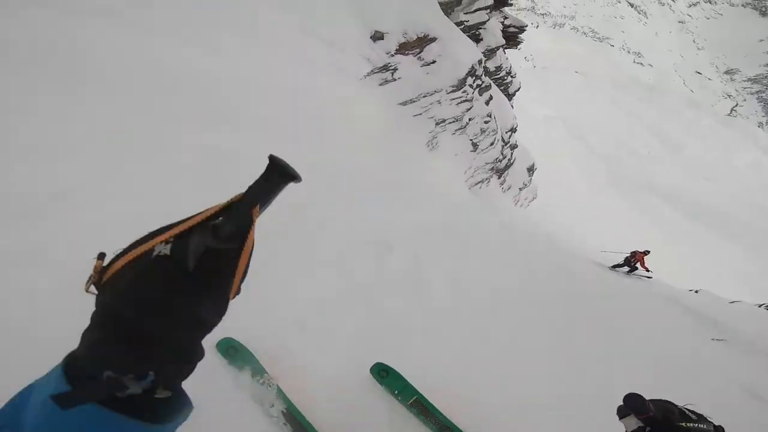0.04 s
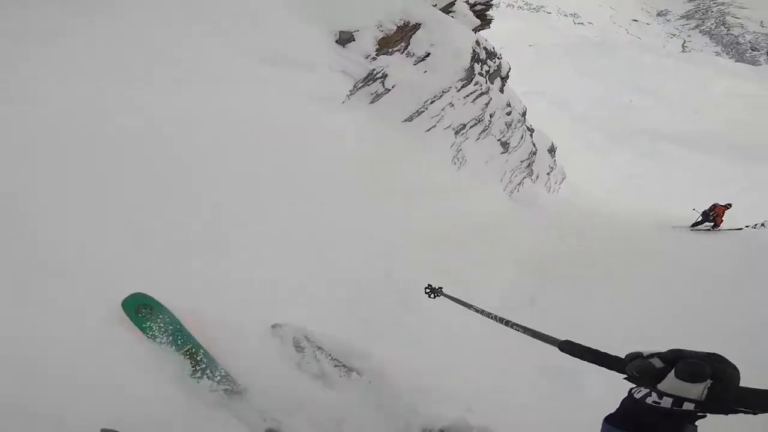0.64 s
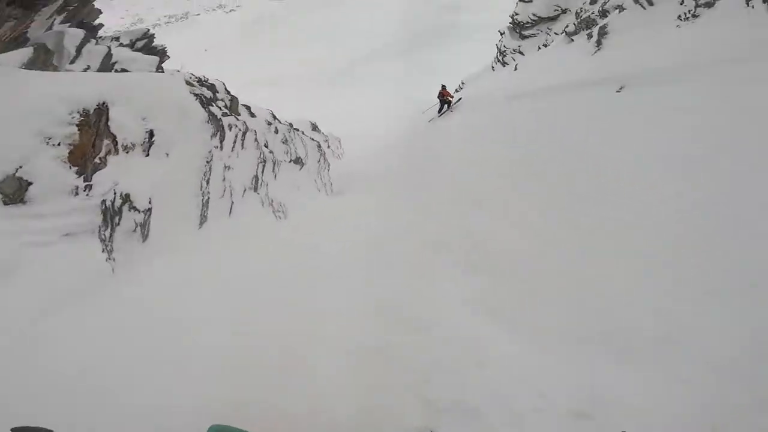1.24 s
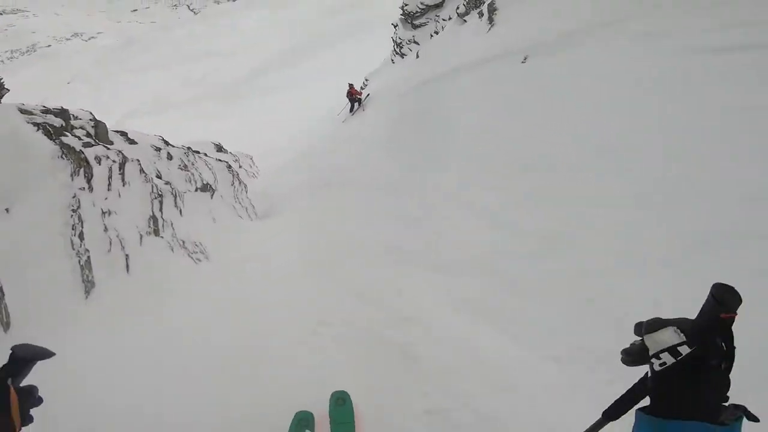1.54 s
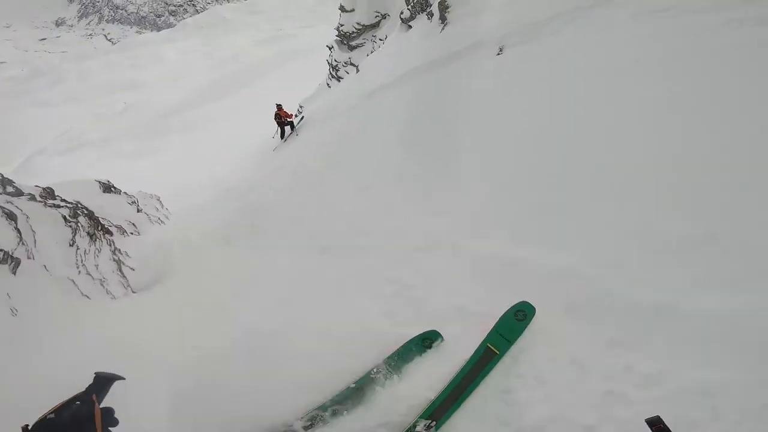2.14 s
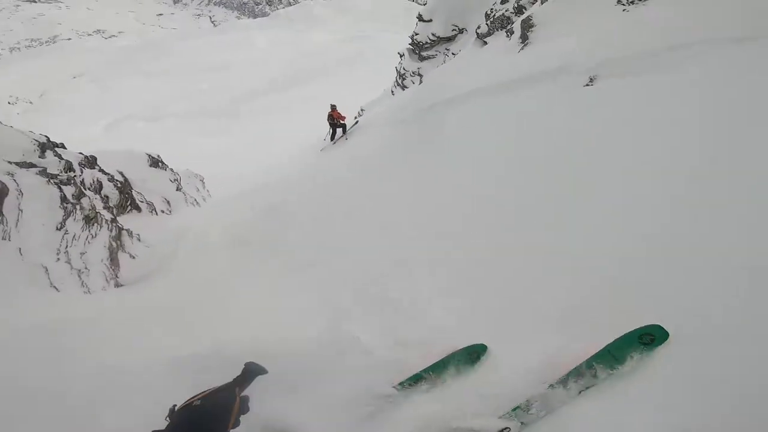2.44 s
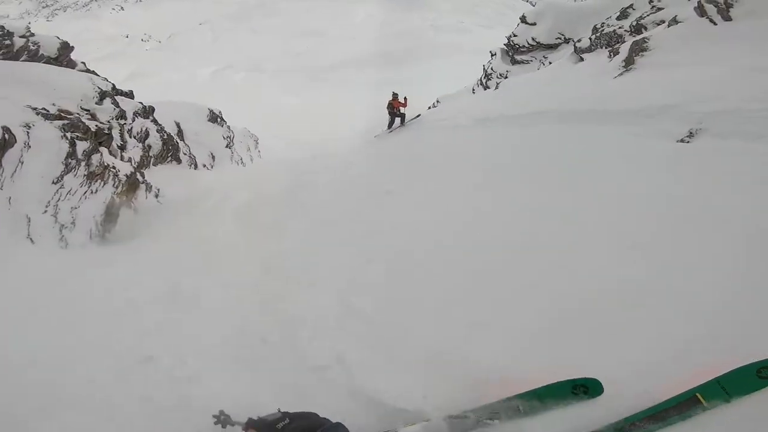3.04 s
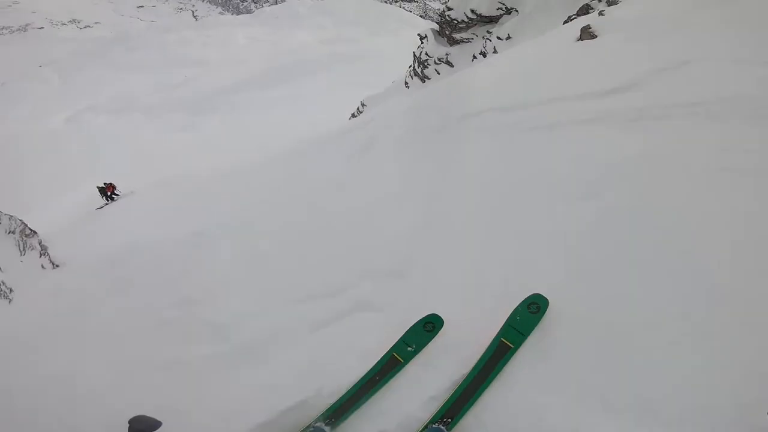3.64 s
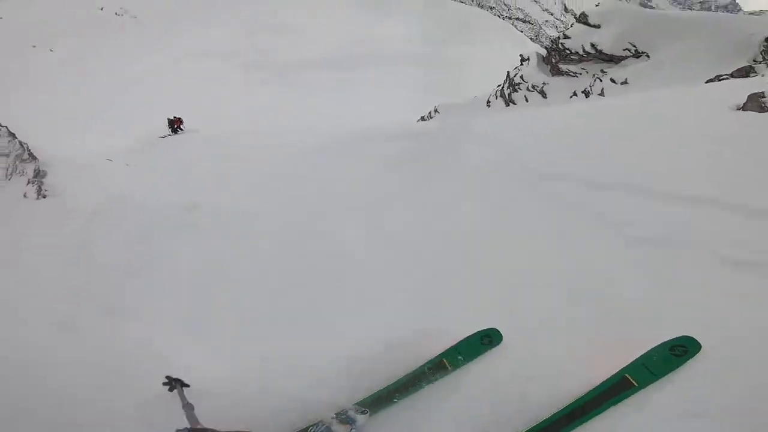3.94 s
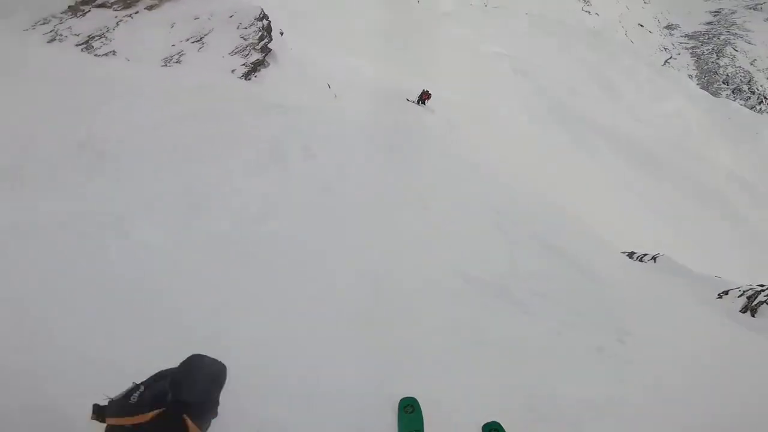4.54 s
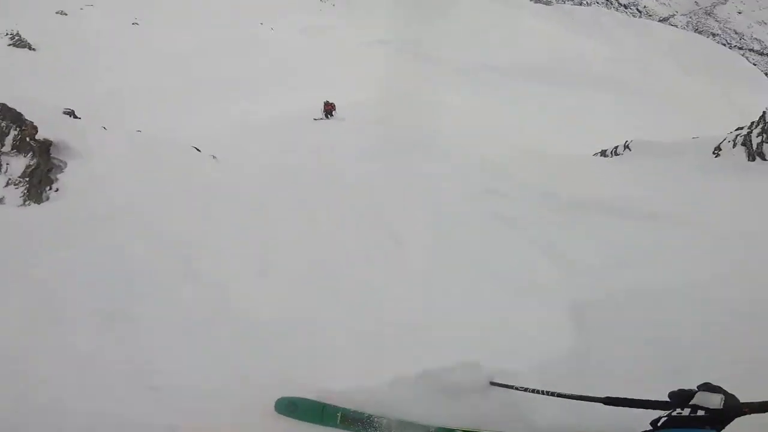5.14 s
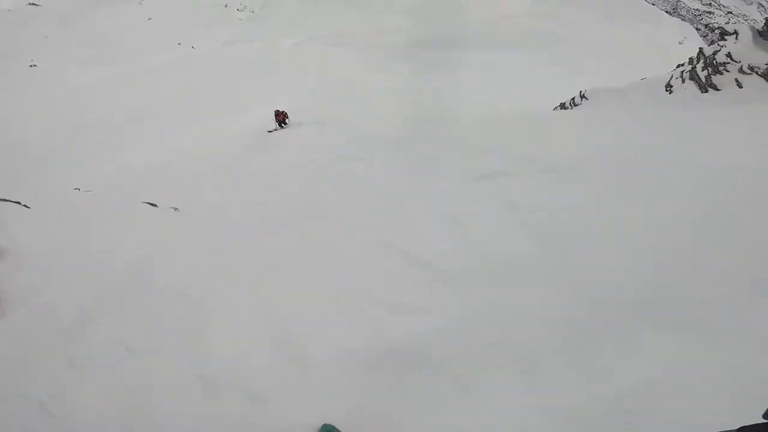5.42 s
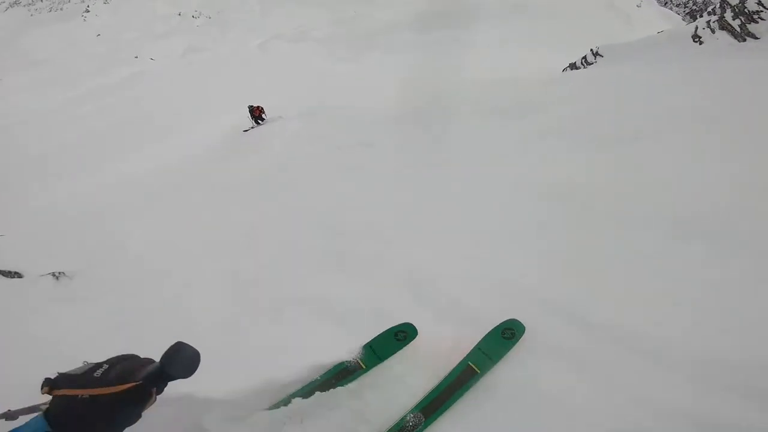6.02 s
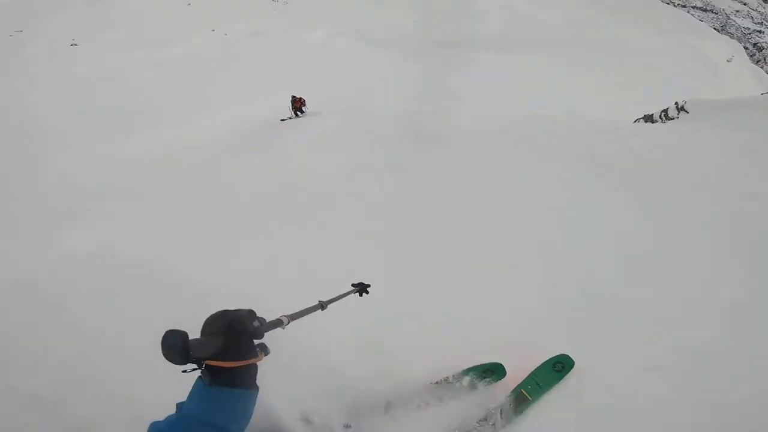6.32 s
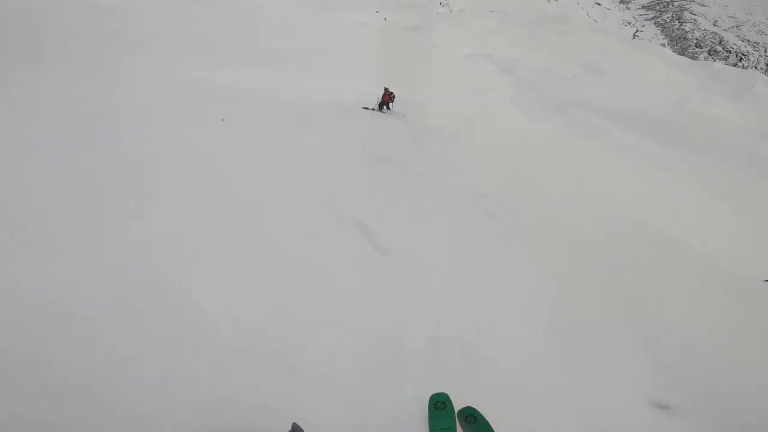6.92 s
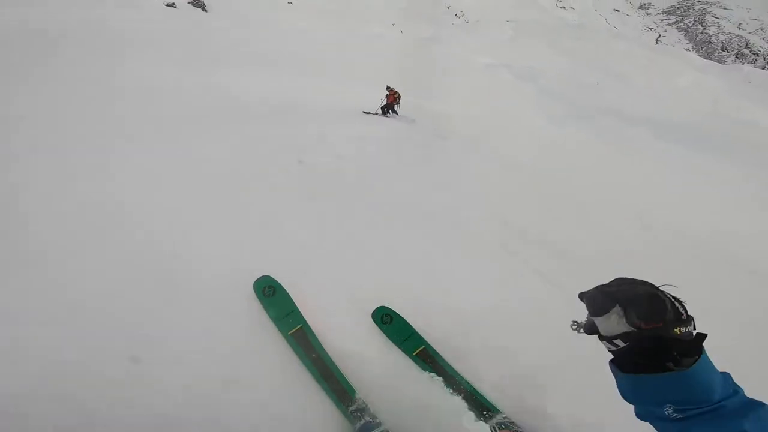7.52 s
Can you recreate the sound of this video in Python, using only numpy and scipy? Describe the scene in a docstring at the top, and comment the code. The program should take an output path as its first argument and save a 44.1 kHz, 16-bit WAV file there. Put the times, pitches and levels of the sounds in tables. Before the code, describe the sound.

Skis scrape and swish through snow in linked turns, with gusts of wind buffeting the microphone and a few gear clacks.

```python
"""Skis link turns down a steep snow slope, heard from the skier's helmet.
In each turn the edges bite and ring, then skid, shoving snow aside and spraying it.
The gear clacks amid hollow swishes and scuffs; between turns gusts buffet the microphone.
Near the middle the sound cuts out for a moment and fades back in."""
import sys
import numpy as np
from scipy import signal
from scipy.fft import rfft, irfft, next_fast_len
from scipy.io import wavfile
from scipy.ndimage import uniform_filter1d, map_coordinates

SR = 44100
rng = np.random.default_rng(int(sys.argv[2]) if len(sys.argv) > 2 else 0)


def transcribe(signal):
    """Save signal, clipped to [-1, 1], as a 16-bit WAV file at the path in sys.argv[1]."""
    frames = np.atleast_2d(signal).T
    limited = np.clip(frames, -1, 1)
    pcm = np.round(limited * 32767).astype(np.int16)
    wavfile.write(sys.argv[1], SR, pcm)


N = 342657
T = np.arange(N) / SR

# Edge load per turn: full_s, rise_s, hold_s, release_s, scrape_db, rasp_re_grind_db,
# shove_re_scrape_db, spray_re_scrape_db, ring_hz, slide_hz_per_s, ring_re_scrape_db
TURN_LOADS = [(0.038, 0.13, 0.16, 0.74, -27, 1, -7.5, -13.5, 2360, 0, -21),
              (2.011, 0.66, 0.38, 0.15, -44, 32, -14.5, -8, 3030, 501, -7),
              (2.801, 0.54, 0.23, 0.3, -26, 0.5, -17.5, -23.5, 2790, -900, -18.5),
              (3.765, .11, 0.36, 0.22, -25.5, -0.5, -19.5, -17.5, 2780, 400, -11),
              (4.721, 0.076, 0.26, 0.46, -29, 2.5, -6, -13, 2973, -450, -10),
              (5.934, 0.35, 0.46, .29, -35, 4, -18, -13.5, 2934, -100, -11),
              (7.44, 0.74, 0.27, 0.44, -37.5, 8, -18, -4.5, 2227, -450, -2)]
LOAD_EXPONENT = 1.56  # edge amplitude = load ** exponent
# Thrown-snow spectrum: freq_hz, gain_db
SPRAY_SPECTRUM = [(2500, -0.5), (4500, 3), (5300, 1), (6300, -2), (7500, -2), (8700, -7), (9900, -8.5),
                  (11000, -21), (12800, -31), (14200, -32.5), (15000, -55)]


def undb(db):
    """Decibels to gain."""
    return 10 ** (np.asarray(db) / 20)


def unit(x):
    """Scale to rms 1."""
    return x / np.sqrt(np.mean(x ** 2))


def add(out, start_s, x):
    """Mix x into out."""
    i = max(int(start_s * SR), 0)
    out[i:i + len(x)] += x[:N - i]


def colour(x, spectrum):
    """Filter by (freq_hz, gain_db) points; 12 dB/octave skirts."""
    hz, db = np.transpose(spectrum)
    size = next_fast_len(N + 4096)
    bin_hz = np.maximum(np.arange(size // 2 + 1) * SR / size, 1)
    gain = undb(np.interp(np.log(bin_hz), np.log(hz), db))
    skirts = np.minimum(bin_hz / hz[0], 1) ** 2 * np.minimum(hz[-1] / bin_hz, 1) ** 2
    return irfft(rfft(x, size) * gain * skirts, size)[:N]


def walk(rate_hz):
    """Random line segments, rms 1."""
    knots = rng.standard_normal(8192)
    return unit(map_coordinates(knots, [T * rate_hz], order=1, mode="wrap"))


def flutter(rate_hz, depth_db):
    """Wavering gain, mean power 1."""
    return unit(undb(depth_db * walk(rate_hz)))


def swell(full_s, rise_s, hold_s, release_s):
    """Trapezoid envelope, 0 to 1."""
    corners_s = [full_s - rise_s, full_s, full_s + hold_s, full_s + hold_s + release_s]
    return np.interp(T, corners_s, [0, 1, 1, 0])


def narrow_noise(centre_hz, width_hz):
    """Noise band following a per-sample centre."""
    draw = rng.standard_normal((2, N))
    lowpass = signal.butter(2, width_hz / 2, fs=SR, output="sos")
    baseband = signal.sosfilt(lowpass, draw[0] + 1j * draw[1])[-len(centre_hz):]
    return np.real(baseband * np.exp(2j * np.pi * np.cumsum(centre_hz) / SR))


def burst(half_s, start_hz, end_hz, width_hz):
    """Gliding noise band: swells for half_s, fades for half_s."""
    progress = np.linspace(0, 1, int(2 * half_s * SR))
    band = narrow_noise(np.interp(progress, [1 / 4, 3 / 4], [start_hz, end_hz]), width_hz)
    return unit(band * np.sin(np.pi * progress) ** 2) / np.sqrt(2)


def eddies(spectrum, span_s):
    """Turbulence in a steady stream, level partly evened over span_s."""
    x = unit(colour(rng.standard_normal(N), spectrum))
    local_power = np.abs(uniform_filter1d(x ** 2, size=int(span_s * SR)))
    return unit(x / np.sqrt(local_power + 0.25))


def gust_gains():
    """Rumble and buffet gains: even airflow plus gusts, strongest with the skis pointing downhill."""
    # Gusts: full_s, hold_s, rumble_db, buffet_db
    gusts = [(0, 0.59, -32.5, -41.5), (0.633, 0.086, -27, -31), (0.922, 0.21, -34, -55),
             (1.358, 0.066, -21, -25.5), (1.543, 0.17, -26, -27), (1.815, 0.17, -23, -26),
             (2.021, 0.44, -24.5, -35), (2.623, 0.069, -33, -48), (3.338, 0.46, -29.5, -32),
             (3.8, 0.14, -33, -40), (4.542, 0.65, -37, -36), (5.31, 0.11, -34, -62),
             (5.567, 0.29, -28, -47.5), (5.843, 0.3, -26.5, -28), (6.19, 0.19, -32, -39.5),
             (6.851, 0.29, -29, -29.5), (7.213, 0.38, -23.5, -33), (7.64, 0.15, -33, -34.5)]
    stream_rumble_db, stream_buffet_db, growth_db_per_s = -43, -50, 1
    power = undb([[stream_rumble_db], [stream_buffet_db]]) ** 2
    for full_s, hold_s, rumble_db, buffet_db in gusts:
        growth = undb(growth_db_per_s * np.clip(T - full_s, 0, hold_s))
        gust = swell(full_s, rise_s=0.1, hold_s=hold_s, release_s=0.063) * growth
        power = power + np.outer(undb([rumble_db, buffet_db]), gust) ** 2
    return np.sqrt(power)


def wind():
    """Large eddies rock the diaphragm; small ones come in clumps and crackle on their crests."""
    # Large-eddy, small-eddy and tearing-air spectra: freq_hz, gain_db
    rumble_spectrum = [(10, -10), (22, -3), (42, 0), (74, 0), (110, -5.5), (170, -14.5), (350, -31.5)]
    buffet_spectrum = [(60, -50.5), (115, 2), (160, -0.5), (230, -5), (330, -11.5), (600, -18),
                       (1200, -31.5)]
    crackle_spectrum = [(280, -10), (420, 1), (700, -9.5), (1200, -12), (1800, -14.5), (3200, -49)]
    # Sharp slaps of air: middle_s, half_s, level_db, centre_hz
    slaps = [(0.045, 0.011, -20.5, 151), (0.096, 0.013, -31, 162), (0.188, 0.044, -32.5, 186),
             (1.257, 0.046, -29.5, 71), (1.364, 0.03, -40, 597), (1.385, 0.081, -30, 136.4),
             (1.517, 0.024, -25, 147), (1.569, 0.027, -36, 1037), (1.603, 0.016, -32.5, 717),
             (1.608, 0.018, -20, 232), (1.647, 0.02, -22.5, 160), (1.7, 0.025, -19, 100),
             (1.82, 0.032, -16, 80.5), (1.863, 0.0091, -26, 749), (1.878, 0.024, -20.5, 232),
             (1.938, 0.021, -17.5, 81), (2.045, 0.023, -19.5, 77), (2.232, 0.021, -32, 595),
             (4.243, 0.018, -38, 130), (4.317, 0.0284, -35.5, 123), (4.472, 0.045, -31.5, 59.5),
             (4.558, 0.0166, -25, 89), (5.221, 0.014, -50, 610), (5.559, 0.015, -32, 191),
             (5.869, 0.011, -22, 180), (5.956, 0.017, -24, 80), (6.374, .025, -33, 133),
             (6.708, 0.026, -31.5, 150), (7.001, 0.055, -23.5, 135.6), (7.023, 0.029, -21, 65),
             (7.315, .02, -25.5, 160), (7.585, .02, -23, 149.3)]
    rumble_gain, buffet_gain = gust_gains()
    rumble = eddies(rumble_spectrum, span_s=0.21)
    buffets = eddies(buffet_spectrum, span_s=0.055) * flutter(rate_hz=97, depth_db=1.5)
    crests = np.clip(buffets, 0, 2) ** 2
    crackle = undb(-14.5) * unit(colour(rng.standard_normal(N) * crests, crackle_spectrum))
    out = rumble * rumble_gain + (buffets + crackle) * buffet_gain
    for middle_s, half_s, level_db, centre_hz in slaps:
        slap = burst(half_s, centre_hz, centre_hz, width_hz=0.76 * centre_hz)
        add(out, middle_s - half_s, undb(level_db) * slap)
    return out


def swishes():
    """Hollow sliding swishes, ski skids on snow and brief scuffs, each with a rough band above."""
    # Swishes, skids and scuffs: middle_s, half_s, start_hz, end_hz, width_hz, level_db
    sweeps = [(0.268, 0.18, 1050, 853, 540, -31.5), (1.144, .028, 2300, 1910, 1600, -37),
              (1.245, 0.15, 1750, 1750, 550, -43.5), (1.497, 0.029, 1493, 1430, 400, -42.5),
              (2.65, 0.23, 1077, 1016, 397, -41.5), (4.138, 0.21, 1063, 717, 398, -41),
              (4.418, 0.053, 154, 186, 40, -29.5), (4.433, 0.039, 445, 756, 220, -39.5),
              (4.541, .025, 1156, 1310, 700, -35), (5.366, 0.06, 559.5, 800, 380, -36),
              (5.381, 0.026, 1580, 1630, 180, -34.5), (5.425, 0.025, 1700, 1560, 420, -35.5),
              (5.458, 0.022, 1664, 1570, 260, -37), (5.483, 0.064, 645, 1154, 280, -39.5),
              (5.565, 0.071, 950, 1120, 800, -36), (5.803, 0.035, 1700, 1730, 220, -36),
              (6.761, 0.13, 1613, 1945, 650, -39)]
    scuff_db, scuff_ratio = -13.5, 1.45  # level and centre re the swish
    tones, scuffs = np.zeros((2, N))
    for middle_s, half_s, start_hz, end_hz, width_hz, level_db in sweeps:
        tone = burst(half_s, start_hz, end_hz, width_hz)
        scuff = burst(half_s, start_hz * scuff_ratio, end_hz * scuff_ratio, width_hz=0.52 * start_hz)
        add(tones, middle_s - half_s, undb(level_db) * tone)
        add(scuffs, middle_s - half_s, undb(level_db) * scuff)
    return tones + undb(scuff_db) * scuffs * flutter(rate_hz=220, depth_db=2.5)


def clacks():
    """Skis and poles knock: a short rough contact rings the gear."""
    # Knocks: start_s, peak_db, contact_t60_s, brightness_hz
    knocks = [(0.044, -18.5, 0.035, 1600), (0.175, -16, 0.04, 1400), (0.487, -26, 0.025, 1500),
              (1.142, -32, 0.07, 2020), (1.21, -31, 0.03, 2100), (1.324, -41, 0.015, 3770),
              (1.518, -29, 0.018, 4270), (4.403, -34, 0.015, 850), (4.595, -19, 0.03, 1900),
              (4.62, -23, 0.038, 1900), (5.215, -21, 0.03, 1000), (6.695, -25.5, 0.027, 1770)]
    # Gear resonances: pitch_hz, width_hz, gain_db
    modes = [(642, 240, 8.5), (1220, 710, -8.5), (1800, 640, 6.5), (2900, 650, 7.5), (4400, 1200, -14)]
    out = np.zeros(N)
    t = T[:SR // 5]
    for start_s, peak_db, contact_t60_s, brightness_hz in knocks:
        contact = rng.standard_normal(len(t)) * np.exp(-np.log(1000) * t / contact_t60_s)
        band_hz = [brightness_hz / 2, brightness_hz * 1.07]
        contact = signal.sosfilt(signal.butter(2, band_hz, "bandpass", fs=SR, output="sos"), contact)
        knock = sum(undb(gain_db) * signal.lfilter(*signal.iirpeak(hz, hz / width_hz, fs=SR), contact)
                    for hz, width_hz, gain_db in modes)
        add(out, start_s, undb(peak_db) * knock / np.abs(knock).max())
    return out


def grains(spectrum, per_s, spread_db):
    """Snow crystals breaking: dense filtered clicks of random size, rms 1."""
    sizes = undb(spread_db * np.minimum(rng.exponential(size=N), 5))
    clicks = (rng.random(N) < per_s / SR) * sizes * rng.choice([-1, 1], N)
    return unit(colour(clicks, spectrum))


def spurts():
    """Handfuls of crystals fly off the edges and patter down."""
    # Thrown snow: full_s, hold_s, level_db
    throws = [(0.11, 0.05, -41.5), (1.134, 0.01, -50), (2.78, 0.25, -57), (3.42, 0.29, -57),
              (3.802, 0.12, -52), (3.952, 0.023, -41), (4.164, .03, -48), (4.475, 0.048, -55.5),
              (5.09, 0.055, -48), (6.324, 0.032, -47.5), (6.702, .02, -53), (7.02, 0.27, -50.5),
              (7.286, .04, -46)]
    gain = sum(undb(level_db) * swell(full_s, rise_s=0.013, hold_s=hold_s, release_s=0.04)
               for full_s, hold_s, level_db in throws)
    return grains(SPRAY_SPECTRUM, per_s=3100, spread_db=1.5) * gain


def body_echo(x):
    """Reflection off the skier's body; the path sways, shifting the comb colour."""
    lag_s = 0.001702 * (1 + 0.037 * walk(rate_hz=3.4))
    gain = undb(-17)
    echo = gain * map_coordinates(x, [(T - lag_s) * SR], order=3)
    return (x + echo) / np.sqrt(1 + gain ** 2)


def edge_rings():
    """A loaded edge rings in a narrow band that slides as the ski's bend changes."""
    out = np.zeros(N)
    for full_s, rise_s, hold_s, release_s, scrape_db, *_, ring_hz, slide_hz_per_s, ring_db in TURN_LOADS:
        edge = swell(full_s, rise_s, hold_s, release_s) ** LOAD_EXPONENT
        loaded = edge > 0
        centre_hz = ring_hz + slide_hz_per_s * (T[loaded] - full_s)
        ring = unit(narrow_noise(centre_hz, width_hz=150))
        out[loaded] += undb(scrape_db + ring_db) * edge[loaded] * ring
    return out


def snow_powers(scrape_db, bite_db, shove_db, spray_db):
    """Grind, rasp, shove and spray powers; bite_db is rasp re grind, shove_db is re scrape."""
    scrape, bite, shove, spray = (undb(db) ** 2 for db in (scrape_db, bite_db, shove_db, spray_db))
    grind = scrape / (1 + bite)
    return np.array(np.broadcast_arrays(grind, grind * bite, scrape * shove, spray))


def snow_gains():
    """Grind, rasp, shove and spray gains: the bases glide throughout, each turn adds its edges."""
    # Flat bases gliding: time_s, level_db, shove_re_glide_db
    glide = [(0, -42, 6.5), (.8, -37.5, -6.5), (.95, -46, -7), (1.25, -44, -7), (1.56, -38.5, -6),
             (2.25, -42, -6.5), (3.34, -44.5, -9), (3.56, -33.5, -11), (4.33, -46, -2), (4.49, -49.5, -1.5),
             (4.6, -35, -3.5), (5.32, -45, -2), (6.33, -36.5, -4.5), (6.56, -48, -4.5), (6.8, -40, -2),
             (7.77, -31, -5.5)]
    bite_loss_db_per_s, shove_rise_db_per_s = 12, 9.5  # the edge skids, snow piles up against it
    time_s, *columns = np.transpose(glide)
    glide_db, glide_shove_db = (np.interp(T, time_s, column) for column in columns)
    glide_spray_db = -52 + 0.1 * (glide_db - glide_db.mean())
    power = snow_powers(glide_db, bite_db=-2, shove_db=glide_shove_db, spray_db=glide_spray_db)
    for full_s, rise_s, hold_s, release_s, scrape_db, bite_db, shove_db, spray_db, *_ in TURN_LOADS:
        edge = swell(full_s, rise_s, hold_s, release_s) ** LOAD_EXPONENT
        age_s = np.clip(T - full_s, 0, hold_s + release_s)
        power += edge ** 2 * snow_powers(scrape_db, bite_db - bite_loss_db_per_s * age_s,
                                         shove_db + shove_rise_db_per_s * age_s, scrape_db + spray_db)
    return np.sqrt(power)


def skis():
    """Snow shears in uneven slips: bases grind, edges rasp, shoved snow crunches, spray hisses."""
    # Flat-base, biting-edge and shoved-snow spectra: freq_hz, gain_db
    grind_spectrum = [(450, -37), (750, -15.5), (1000, -2.5), (1210, 1), (1420, -1), (1630, 0),
                      (1810, -2.5), (2080, -1.5), (2900, -9), (4600, -38.5), (9000, -65)]
    rasp_spectrum = [(900, -31.5), (1500, 0.5), (1750, -5), (2100, -4.5), (2400, -0.5), (2680, 2),
                     (2880, 0), (3200, 0.5), (3650, -7), (4200, -8), (6000, -21.5), (9500, -35),
                     (12500, -64)]
    shove_spectrum = [(100, -33), (220, -4.5), (400, 2), (520, 2), (700, 2.5), (900, 2.5), (1300, -7.5),
                      (2200, -17.5)]
    # Bumps press (+) or lift (-) the skis: full_s, hold_s, ramp_s, change_db
    bumps = [(0.21, 0.025, .03, 0), (1.333, 0.204, .02, -7), (2.29, 0.06, 0.033, 3.5),
             (2.525, 0.068, 0.033, 1.5), (2.803, 0.032, .03, 0.5), (2.878, 0.034, 0.034, -2.5),
             (3.932, 0.068, .012, 1), (3.996, 0.167, .008, -2.5), (4.377, 0.079, 0.013, -4.5),
             (4.472, 0.066, .008, 3), (4.985, 0.035, 0.023, 3), (5.208, 0.03, 0.028, 3),
             (5.33, 0.03, .03, -2), (6.03, 0.035, .03, 1), (6.123, 0.04, .03, -3.5)]
    grind_gain, rasp_gain, shove_gain, spray_gain = snow_gains()
    chatter = flutter(rate_hz=70, depth_db=0.74)
    crust = flutter(rate_hz=16, depth_db=0.35)
    bump_db = sum(db * swell(full_s, ramp_s, hold_s, ramp_s) for full_s, hold_s, ramp_s, db in bumps)
    hollow_hz = 1680 + 39.8 * walk(rate_hz=6)  # hollow, wavering tone in the scrape
    hollow = undb(-11) * unit(narrow_noise(hollow_hz, width_hz=230))
    grind = grains(grind_spectrum, per_s=14000, spread_db=1.3) + hollow
    grind *= flutter(rate_hz=46, depth_db=0.43)
    rasp = grains(rasp_spectrum, per_s=12000, spread_db=0)
    shove = grains(shove_spectrum, per_s=4000, spread_db=2) * flutter(rate_hz=70, depth_db=2)
    spray = grains(SPRAY_SPECTRUM, per_s=8000, spread_db=0.2) * flutter(rate_hz=45, depth_db=0.5)
    snow = grind * grind_gain + rasp * rasp_gain + shove * shove_gain + spray * spray_gain
    return body_echo((snow + edge_rings()) * chatter * crust * undb(bump_db) + spurts())


def scene():
    """Open slope, no reverb; two close microphone ports, slightly wide in the treble, width wavering."""
    # Side re mid: freq_hz, gain_db
    side_spectrum = [(60, -44), (250, -35), (1000, -28), (2000, -24), (4000, -19), (8000, -16),
                     (13000, -27)]
    mid = skis() + clacks() + wind() + swishes()
    width = unit(np.clip(1 + walk(rate_hz=5), 0, 1.5))
    side = colour(mid * walk(rate_hz=300), side_spectrum) * width
    return np.array([mid + side, mid - side])


def record(dry):
    """Brief dropout with a fade back in, then a steep low-pass."""
    dropout_s, cutoff_hz = [3.072, 3.074, 3.28, 3.355], 15100
    gate = np.interp(T, dropout_s, [1, 0, 0, 1]) ** 2
    return signal.sosfilt(signal.ellip(8, 0.2, 70, cutoff_hz, fs=SR, output="sos"), dry * gate)


dry = scene()
out = record(dry)
transcribe(out)
```